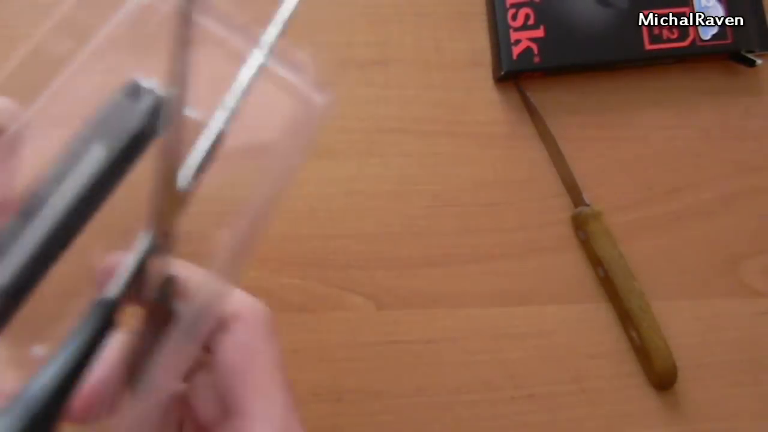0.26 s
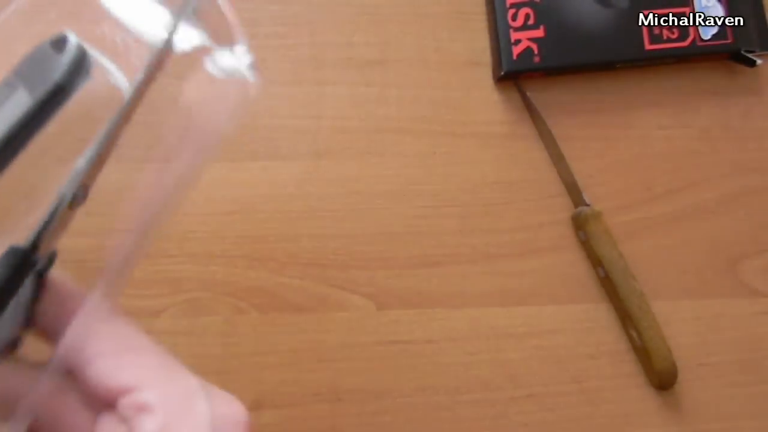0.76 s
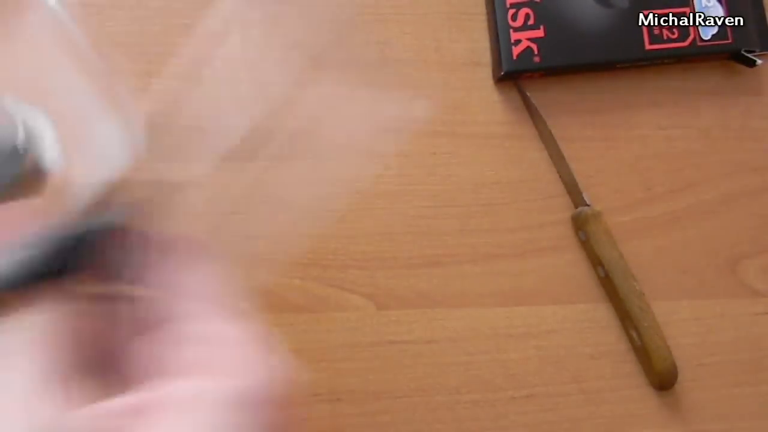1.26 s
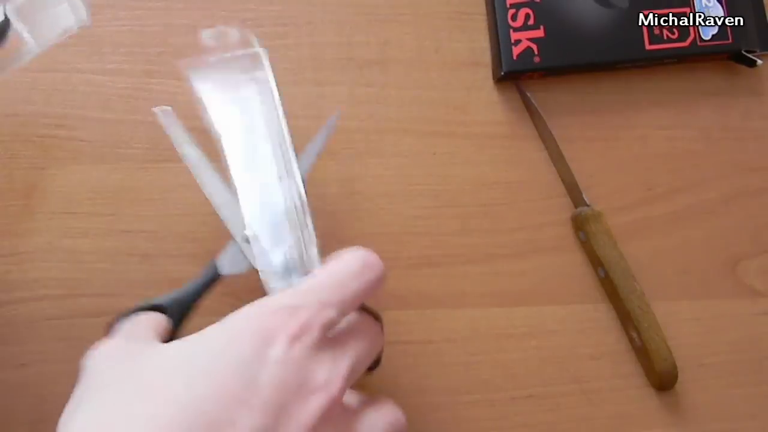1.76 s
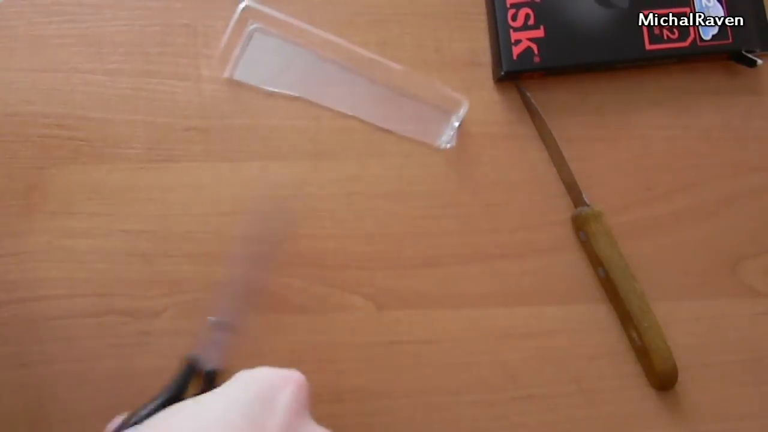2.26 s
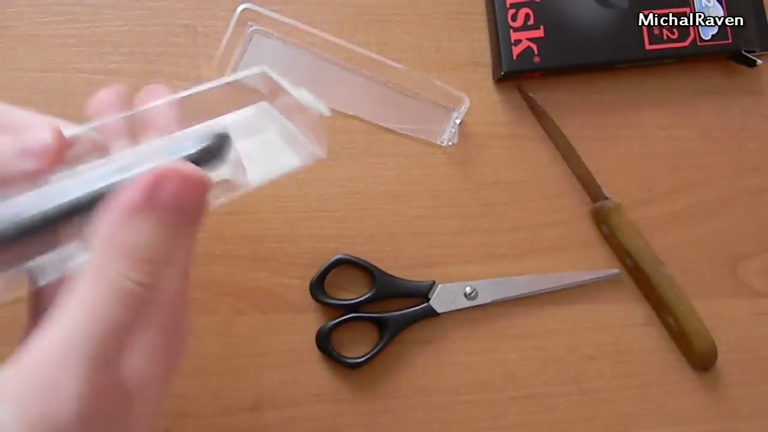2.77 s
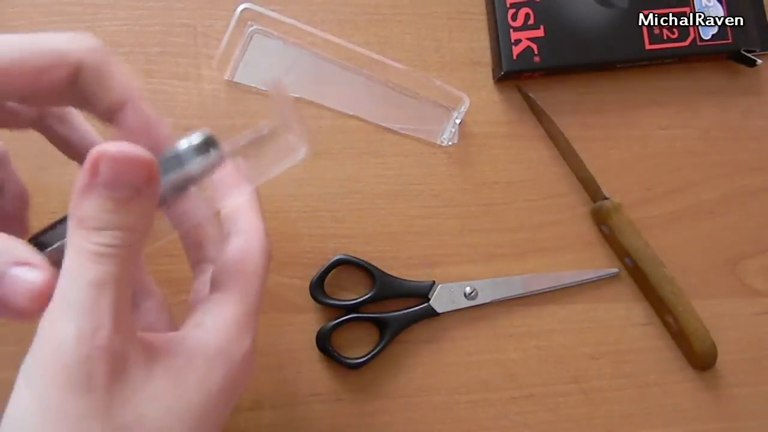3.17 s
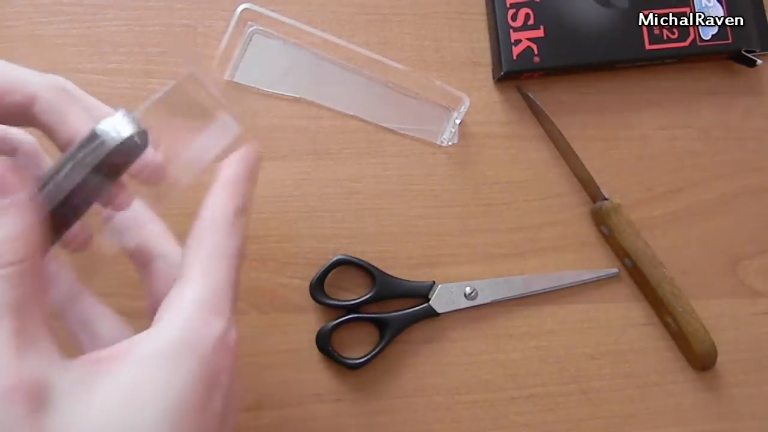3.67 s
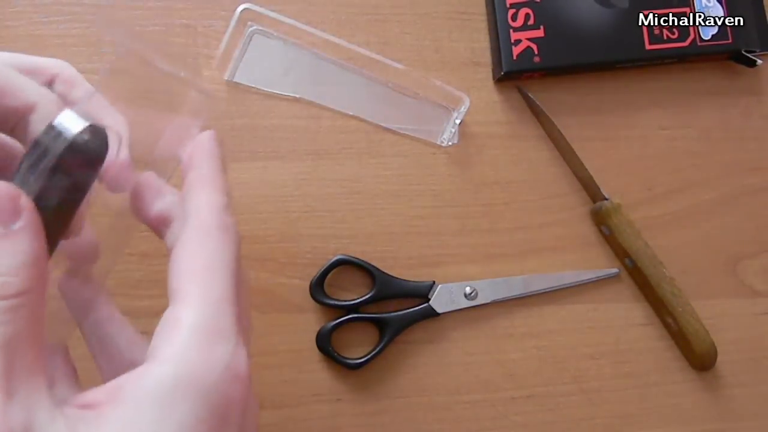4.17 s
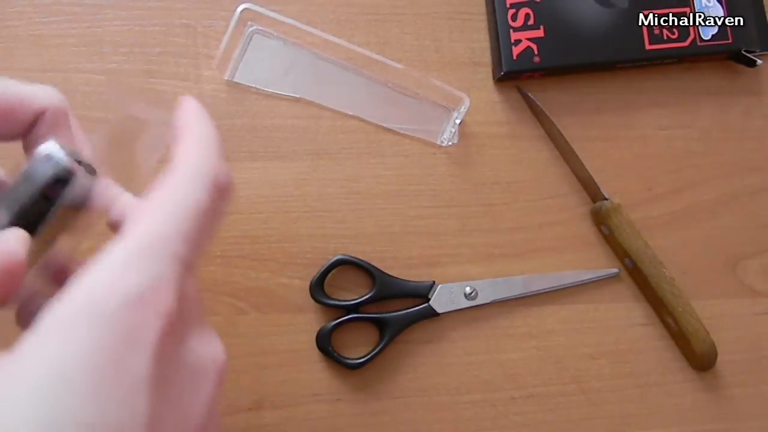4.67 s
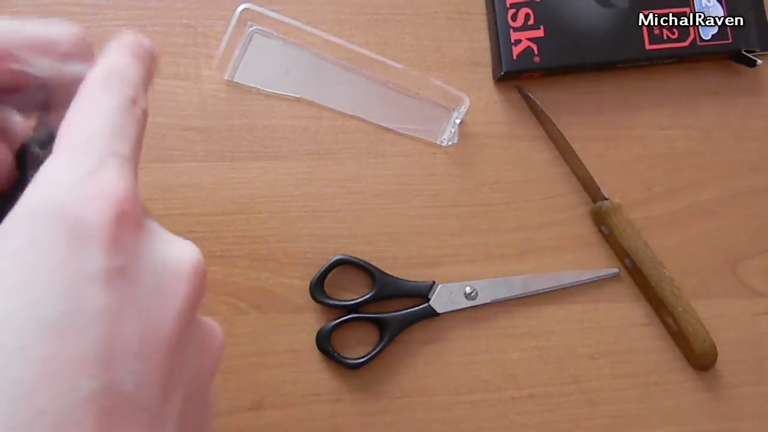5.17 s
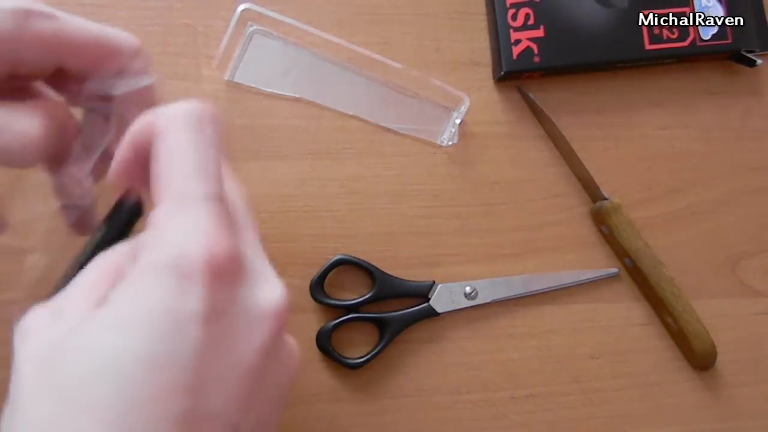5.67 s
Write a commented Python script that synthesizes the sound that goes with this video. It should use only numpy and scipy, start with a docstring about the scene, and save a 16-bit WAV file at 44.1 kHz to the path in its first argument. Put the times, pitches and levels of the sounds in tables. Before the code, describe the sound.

Close to the microphone in a small, quiet room, stiff plastic packaging scrapes, ticks and snaps as scissors cut it. Next the scissors clatter onto a wooden table with a brief steel ring and a short slide. Faint handling follows, then the plastic crackles and snaps again as it is pulled apart by hand, with one very loud crack and hollow pop near the end.

```python
"""Scissors crunch through a stiff clear plastic pack, close above a wooden table in a small room.
The blades rub and slip, the shell snaps and ticks, and its walls buckle with hollow pops.
An offcut slides; the scissors are put down, skid and rock to rest, ringing the steel and the wood.
Then fingers prise the pack open. The hardest snaps overload the microphone."""
import sys
import numpy as np
from scipy import signal
from scipy.fft import rfft, irfft, next_fast_len
from scipy.io import wavfile

SR = 44100
rng = np.random.default_rng(int(sys.argv[2]) if len(sys.argv) > 2 else 0)


def put_to_file(sound):
    """Save the sound as 16-bit audio at rate SR, in the file named by the first command-line argument."""
    columns = np.atleast_2d(sound).T  # one column per channel
    safe = np.clip(columns, -1, 1)
    whole_steps = np.round(safe * 32767)
    wavfile.write(sys.argv[1], SR, whole_steps.astype(np.int16))


N = 260631


def amp(db):
    """Decibels to gain."""
    return 10 ** (np.asarray(db) / 20)


def unit(x):
    """Scale to rms 1."""
    return x / np.sqrt(np.mean(x ** 2) + 1e-20)


def hit_level(x, db):
    """Give a hit the energy of one millisecond at this level."""
    return amp(db) * x / np.sqrt(np.sum(x ** 2) * 1000 / SR)


def add(track, start, sound):
    """Mix a sound in at a start time in seconds."""
    part = track[max(0, round(start * SR)):][:len(sound)]
    part += sound[:len(part)]


def along(points, hz):
    """Read a curve of (Hz, value) points on a log frequency axis."""
    freqs, values = np.transpose(points)
    return np.interp(np.log(hz + 1), np.log(freqs + 1), values)


def filtered(x, response):
    """Shape x with a gain given as a function of frequency."""
    size = next_fast_len(len(x) + SR // 4)
    return irfft(rfft(x, size) * response(np.fft.rfftfreq(size, 1 / SR)), size)[:len(x)]


def eq(x, points, size=2048):
    """Minimum-phase EQ through (Hz, dB) points: nothing rings ahead of an attack."""
    cepstrum = irfft(np.log(amp(along(points, np.fft.rfftfreq(size, 1 / SR)))))
    cepstrum[1:size // 2] *= 2
    cepstrum[size // 2 + 1:] = 0
    impulse = irfft(np.exp(rfft(cepstrum)))
    return signal.fftconvolve(x, impulse)[:len(x)]


def ringing(x, modes):
    """Play x through a body with these (Hz, width Hz, dB) modes; it radiates little above them."""
    def response(hz):
        body = sum((-1) ** k * amp(db) * 1j * hz * width / (centre ** 2 - hz ** 2 + 1j * hz * width)
                   for k, (centre, width, db) in enumerate(modes))
        return body / (1 + 1j * hz / (2 * modes[-1][0]))
    return filtered(x, response)


def burst(t60, attack_s, split_hz=6000, treble_life=0.46):
    """A short scatter of micro-contacts whose treble dies first."""
    t = np.arange(SR // 10) / SR
    noise = rng.standard_normal(len(t)) * (1 - np.exp(-t / attack_s))
    low = signal.lfilter(*signal.butter(1, split_hz, fs=SR), noise)
    high = (noise - low) / np.sqrt(treble_life)
    return low * amp(-60 * t / t60) + high * amp(-60 * t / (t60 * treble_life))


def slips(count, per_s, spread_db):
    """Stick-slip: tiny impulses of uneven size at random times."""
    hits = rng.random(count) < per_s / SR
    signs = rng.choice([-1, 1], count)
    sizes = amp(spread_db * np.clip(rng.standard_normal(count), -2, 2))
    return unit(hits * signs * sizes)


# The colour of the room tone. Each row: frequency in Hz, relative level in dB.
ROOM_TONE = [(24, -73), (40, -50), (155, -27), (176, -20.5), (329, -9.5), (372, -11.5), (503, -8),
             (873, -17), (1040, -18), (2210, -25), (2440, -32.5), (4130, -21.5), (8990, -35), (10700, -32),
             (16000, -47.5)]


def room_tone(db=-61):
    """A steady, soft bed of room noise and hiss."""
    return amp(db) * unit(filtered(rng.standard_normal(N), lambda hz: amp(along(ROOM_TONE, hz))))


# The small room's decay. Each row: frequency in Hz, time to fall 60 dB in seconds.
ROOM_DECAY = [(200, 0.12), (500, 0.36), (1400, 0.33), (4000, 0.36), (9000, 0.26), (15000, 0.22)]


def reverb(x, build_s=0.0014):
    """Echoes thicken over a few milliseconds; each frequency then dies at its own speed."""
    hz, t, noise = signal.stft(rng.standard_normal(SR // 2), SR, nperseg=256)
    decay = amp(-60 * t / along(ROOM_DECAY, hz)[:, None])
    build = 1 - np.exp(-(t / build_s) ** 2)
    tail = signal.istft(noise * decay * build, SR, nperseg=256)[1]
    return signal.fftconvolve(x, tail / np.linalg.norm(tail))[:N]


# The EQ on the reverb return. Each row: frequency in Hz, gain in dB.
ECHO_EQ = [(100, -13.5), (200, -7), (330, 2.5), (1000, 7), (2200, 8.5), (4000, 0.5), (8000, 0.5),
           (11500, 1.5), (15000, -8.5)]


def room_echo(handling, snap_send_db=-15, handling_send_db=-13, walls=3):
    """The room answers; the crumpled shell sends each wall a different waveform, so its echo is smooth."""
    scattered = sum(reverb(shell_snaps()) for _ in range(walls)) / np.sqrt(walls)
    return eq(amp(snap_send_db) * scattered + amp(handling_send_db) * reverb(handling), ECHO_EQ)


# The modes of the table top. Each row: pitch in Hz, width in Hz, level in dB.
WOOD_MODES = [(315, 13.3, 4), (405, 72, -6), (697, 72, 1), (788, 170, -7), (1624, 75, -9.5),
              (2320, 42, -13), (2490, 19, -12), (2870, 110, -5), (3800, 710, -6), (4200, 250, -6.5)]


def wood_ring(force):
    """The wooden table top rings under a contact force."""
    return ringing(force, WOOD_MODES)


# The modes of the scissors. Each row: pitch in Hz, width in Hz, level in dB.
STEEL_MODES = [(463, 150, -3), (965, 270, -9.5), (1780, 400, -10.5), (3220, 260, -0.5), (3660, 450, -0.5),
               (4400, 570, 3.5), (5630, 650, 0), (7270, 690, -3), (9720, 730, -10.5), (12000, 1400, -22)]


def steel_ring(force):
    """The blades ring briefly, damped by their plastic handles."""
    return ringing(force, STEEL_MODES)


# Plastic and steel skid over the table. Each row: start in seconds, length in seconds,
# level of the wood in dB, steel against the wood in dB.
TABLE_SKIDS = [(1.846, .02, -35.5, -10), (2.04, .18, -39, -9), (2.609, 0.32, -29, -7)]


def skids(rise_db_per_s=599.5, sag_db_per_s=24.5, stop_db_per_s=321.5):
    """Fine sliding chatter keeps wood and steel ringing; each skid touches down, slows and stops."""
    chatter = slips(N, per_s=2000, spread_db=5.5)
    wood, steel = unit(wood_ring(chatter)), unit(steel_ring(chatter))
    out = np.zeros(N)
    for start, length, db, steel_db in TABLE_SKIDS:
        t = np.arange(N) / SR - start
        fade_in_db = rise_db_per_s * np.minimum(t, 0)
        fall_db = sag_db_per_s * np.maximum(t, 0) + stop_db_per_s * np.maximum(t - length, 0)
        out += amp(db + fade_in_db - fall_db) * (wood + amp(steel_db) * steel)
    return out


def rocking(start=2.702, first_flight_s=0.0555, shrink=0.79, bright_db=2.5, t60=0.022):
    """Knock rows for the scissors rocking to rest, each bounce shorter and weaker than the last."""
    bounces = []
    for k in range(9):
        landing = start + first_flight_s * np.sum(shrink ** np.arange(k))
        click_db, thud_db = -9.5 - 2.5 * k, -15 - 2 * k
        bounces.append((landing, click_db, thud_db, bright_db, t60))
    return bounces


# The scissors are put down. Each row: start in seconds, click level in dB, table thud level in dB,
# click brightness in dB, time for the contact to fall 60 dB in seconds.
SCISSOR_KNOCKS = [(2.3967, -3.5, -20, -2, .022), (2.4772, -14.5, -28, -7.5, 0.035),
                  (2.4875, -2, -11, -5, 0.12), (2.4933, 2.5, -12, -12, 0.014),
                  (2.506, -10.5, -15.5, -1, 0.22), (2.6119, -2, -17.5, -4.5, 0.023),
                  (2.671, -13, -39, -2.5, 0.024)]


def scissor_knocks(contact_s=0.00007):
    """Steel and handles click on the wood, which rings after each bounce."""
    out, t = np.zeros(N), np.arange(SR // 5) / SR
    thud = wood_ring(t * np.exp(-t / contact_s))
    for start, click_db, thud_db, bright_db, t60 in SCISSOR_KNOCKS + rocking():
        click = steel_ring(burst(t60, attack_s=0.00073))
        # so small a thing radiates little bass
        click = eq(click, [(130, -11.5), (350, -2), (4200, -1), (6500, bright_db)])
        add(out, start, hit_level(click, click_db))
        add(out, start, rng.choice([-1, 1]) * hit_level(thud, thud_db))
    return out


# The colour of stiff plastic crackle. Each row: frequency in Hz, gain in dB.
CRACKLE_EQ = [(60, -56), (180, -25), (380, -2), (750, -3), (1200, -2.5), (2300, -5), (3300, 0), (4500, 4.5),
              (6000, -3.5), (9500, -19), (12000, -22), (16000, -28)]
# Rubs on the pack. Each row: start in seconds, length in seconds, level in dB, low shelf for body in dB.
RUB_STROKES = [(.02, .06, -45.5, 5), (.181, 0.051, -38.5, 6.5), (.226, 0.046, -32, 7),
               (.298, .035, -32, 15), (0.463, 0.019, -52, 20), (0.654, 0.23, -62.5, -15.5),
               (0.92, 0.057, -34.5, 9), (1.016, .111, -58.5, 6), (1.186, 0.32, -44.5, 2.5),
               (1.524, 0.065, -51.5, -6), (1.92, .18, -45, -14), (2.331, 0.057, -50.5, -16.5),
               (3.029, .24, -64.5, 16), (3.466, 0.11, -64, -4), (3.636, 0.062, -48, 0.5),
               (4.049, 0.038, -54.5, 2), (4.51, 0.084, -37.5, 10), (5.068, .045, -38.5, 10.5),
               (5.187, 0.12, -39, 1.5), (5.773, 0.051, -52.5, 6.5)]


def crunch(scrape_db=-5):
    """Blades and fingers rub the plastic; each stroke swells and fades, small slips over a fine scrape."""
    out = np.zeros(N)
    for start, length, db, body_db in RUB_STROKES:
        count = int(length * SR)
        grains = slips(count, per_s=660, spread_db=10.5) + amp(scrape_db) * rng.standard_normal(count)
        swell = np.sin(np.linspace(0, np.pi, count))
        crackle = eq(grains * swell, CRACKLE_EQ)
        stroke = eq(crackle, [(900, body_db), (2600, 0.016)])
        add(out, start, amp(db) * unit(stroke))
    return out


# Hollow pops of the pack. Each row: start in seconds, level in dB, pitch in Hz,
# time to fall 60 dB in seconds.
WALL_POPS = [(.2325, -17.5, 600, .03), (.243, -17.5, 740, .02), (.3075, -13.5, 450, .03),
             (.706, -24.5, 724, .02), (.938, -26, 720, .03), (1.2878, 1, 445.6, .02),
             (5.083, -16.5, 1220, .018), (5.3274, 8.5, 270, .012)]


def wall_pops():
    """A wall of the pack buckles through, swings up and dies away within a few cycles."""
    out, t = np.zeros(N), np.arange(SR // 8) / SR
    for start, db, hz, t60 in WALL_POPS:
        swell = 1 - np.exp(-20 * t / t60)
        add(out, start, amp(db - 60 * t / t60) * swell * np.sin(2 * np.pi * hz * t))
    return out


def shell_crack(db, body_db, treble_db, t60, ring_hz, ring_db=6.5, ring_octaves=0.13):
    """One crack: dense, heavily damped shell modes, plus the ring of the facet that gives way."""
    mid_db = -4.5 + 0.45 * body_db  # the mids rise with the body
    air_db = treble_db - 10.5 + 0.25 * db  # a harder break has more air
    colour = [(50, body_db - 40), (160, body_db - 26), (270, body_db - 6), (430, body_db),
              (800, body_db), (1200, mid_db), (2300, mid_db), (3100, -2), (4500, 0.65),
              (5500, treble_db), (8500, treble_db - 2), (11000, air_db), (16000, air_db - 5)]
    hz = np.geomspace(20, SR / 2, 200)
    facet_db = ring_db * np.exp(-0.5 * (np.log2(hz / ring_hz) / ring_octaves) ** 2)
    curve = np.c_[hz, along(colour, hz) + facet_db]
    return hit_level(eq(burst(t60, attack_s=0.00045), curve), db)


# The pack is under strain. Each row: start in seconds, end in seconds.
STRAIN_SPANS = [(.4, 0.58), (1.35, 2.1), (4.55, 5.8), (5.651, 5.9)]


def crease_ticks(per_s=16, mean_db=-45.5, spread_db=2.5):
    """Tiny creases in the strained pack give way, ticking faintly at uneven moments."""
    out = np.zeros(N)
    for start, end in STRAIN_SPANS:
        for slot in np.arange(start, end, 1 / per_s):
            moment = slot + rng.random() / per_s
            db = mean_db + spread_db * rng.standard_normal()
            add(out, moment, shell_crack(db, body_db=-10.5, treble_db=-7.5, t60=0.012, ring_hz=4600))
    return out


# The snaps of the shell. Each row: start in seconds, level in dB, body and treble in dB against
# the 4 kHz band, time to fall 60 dB in seconds, ring of the facet in Hz.
SHELL_SNAPS = [(0.0304, -18, -10, -24, 0.0037, 3620), (0.0589, -24, 16, -6, 0.023, 4500),
               (0.1987, -23.5, 9, -9, 0.12, 4400), (0.2314, -15.5, 0, -12, .025, 4000),
               (0.2422, -18, -6, -16, 0.073, 4070), (.2478, -17, -19, -4.5, .02, 5130),
               (.275, -21, -4, -9, 0.048, 4350), (.3028, -9.5, -9, -11, 0.043, 3950),
               (0.7046, -24, -3, -14, 0.016, 3930), (0.9457, -15.5, -2.5, -7.5, 0.1, 4000),
               (1.0583, -34.5, -2, -18, .026, 3170), (1.1208, -1.5, -11, -10, 0.017, 3230),
               (1.2114, -17, -10.5, -4, 0.039, 3480), (1.2178, -17.5, -12, -8, 0.012, 3370),
               (1.2775, -19, 1, -7, 0.045, 3900), (1.2837, 4.5, -5.5, -6.5, 0.05, 3470),
               (1.2866, -.5, 6, 5, .015, 3480), (1.4205, -21, 6, -3, 0.042, 4250),
               (1.588, -7.5, -11, -12, 0.0094, 3400), (1.6157, -24.5, -12, -7, .035, 3500),
               (1.704, -14, -8, -8, 0.021, 3400), (1.7785, -27, -2, -6, .007, 4300),
               (1.8314, -16.5, -9, -12, 0.01, 3220), (1.8383, -10, -10.5, -5, 0.036, 3940),
               (1.9211, -16, -11, -8.5, 0.093, 3430), (2.0137, -13, -17, -7, 0.01, 3750),
               (2.043, -18.5, -30, -2, .008, 6400), (2.0807, -23.5, -12.5, -16, 0.029, 3950),
               (2.3553, -34.5, -5, 3.5, .03, 5200), (3.05, -39, -3, -7, .015, 4400),
               (3.105, -34, -15.5, -1, 0.026, 5584), (3.14, -41, -7, -7, .02, 4200),
               (3.266, -37.5, -13, -2, .008, 4400), (4.256, -38, -9, -4, 0.012, 4200),
               (4.3218, -24.5, -8, -5.5, 0.0078, 4200), (4.3524, -13.5, -16, -1, .016, 5630),
               (4.469, -31.5, -1, -9, 0.03, 4150), (4.5025, -4, -21, -10.5, 0.0088, 4600),
               (4.5275, -15, -4.5, -16, 0.021, 3720), (4.5378, -19, -5, -12, 0.021, 4380),
               (4.5545, -19.5, -12.5, -16, 0.01, 3670), (4.8729, -3.5, -12, -5, .02, 6300),
               (4.931, -20, -7, -17, 0.023, 4350), (5.2321, -9, -16.5, -7.5, 0.0089, 4400),
               (5.3242, 6.5, 3, 0, .035, 4200), (5.3859, -8.5, -5, -14.5, 0.016, 3800),
               (5.413, -19.5, 1.5, -12, 0.023, 3740), (5.4529, -15, 5, -16, 0.07, 2650),
               (5.464, -2.5, -2, -6.5, 0.032, 4260), (5.832, -27, -19.5, -5, 0.023, 4350)]


def shell_snaps():
    """The shell snaps as cuts run ahead of the blades and creases flip over."""
    out = np.zeros(N)
    for start, *snap in SHELL_SNAPS:
        add(out, start, shell_crack(*snap))
    return out


def scene():
    """Snaps and pops up front, the handling around them, the echo and room tone behind."""
    handling = crunch() + crease_ticks() + scissor_knocks() + skids()
    echo = room_echo(handling)
    # the pops only push the air close by and raise no echo
    return (shell_snaps() + wall_pops() + handling + echo + room_tone())[None]


def record(dry, ceiling=0.92, low_cut_hz=55, high_cut_hz=16200):
    """The microphone input clips on the hardest snaps; deep bass and the very top are lost."""
    clipped = np.clip(dry[0], -ceiling, ceiling)
    thin = filtered(clipped, lambda hz: 1j * hz / (low_cut_hz + 1j * hz))
    return filtered(thin, lambda hz: 1 / np.sqrt(1 + (hz / high_cut_hz) ** 120))[None]


dry = scene()
out = record(dry)
put_to_file(out)
```